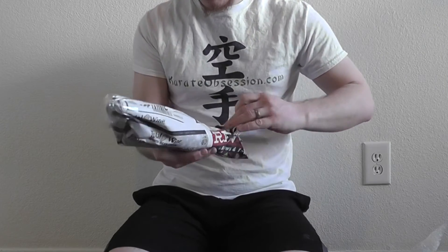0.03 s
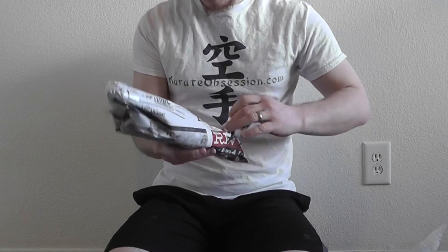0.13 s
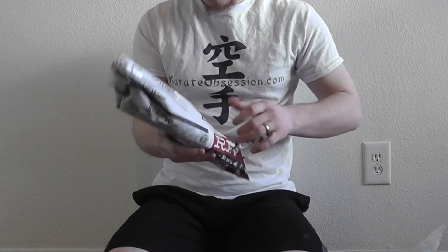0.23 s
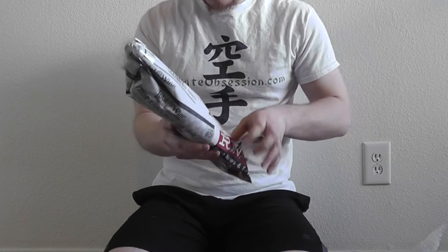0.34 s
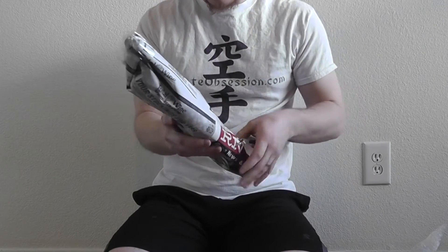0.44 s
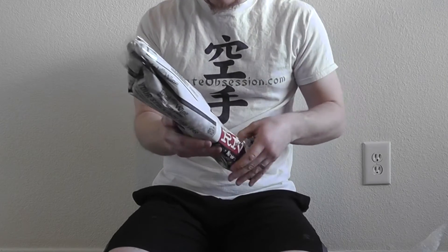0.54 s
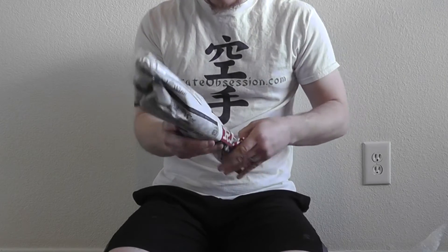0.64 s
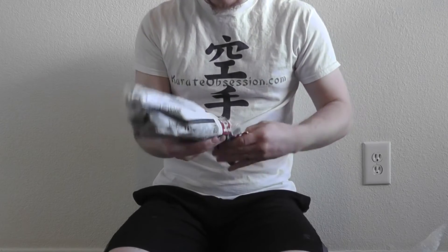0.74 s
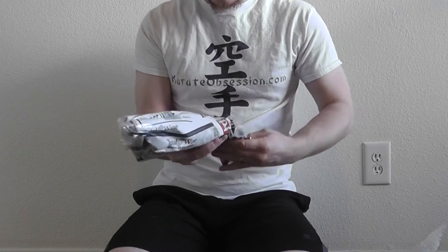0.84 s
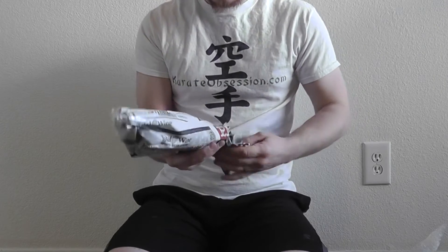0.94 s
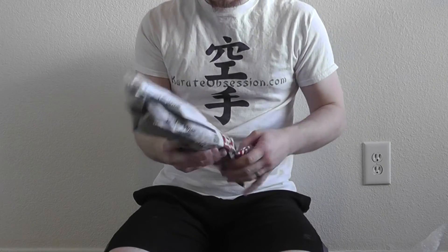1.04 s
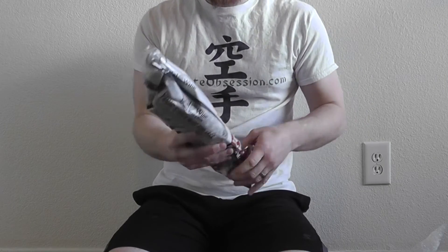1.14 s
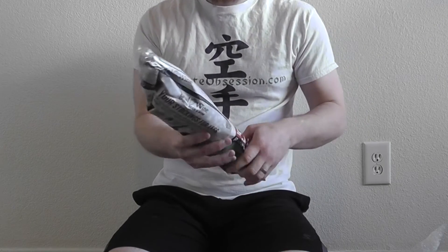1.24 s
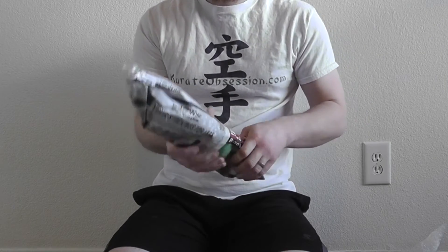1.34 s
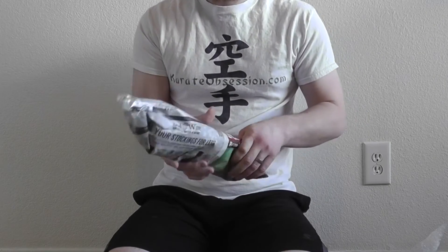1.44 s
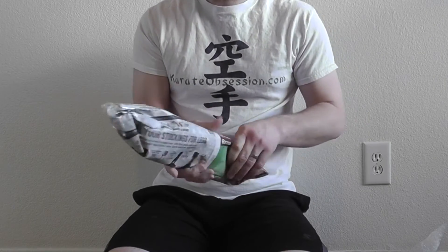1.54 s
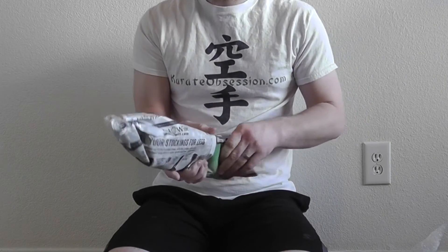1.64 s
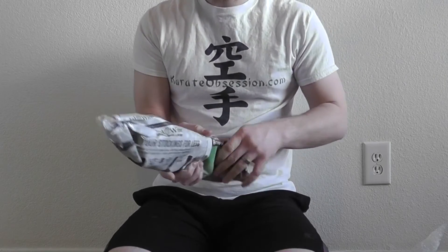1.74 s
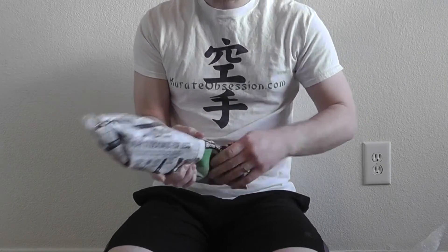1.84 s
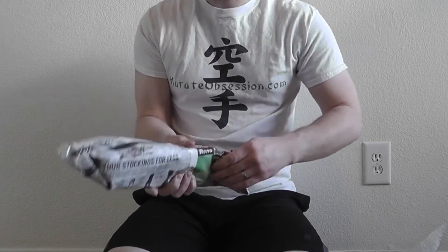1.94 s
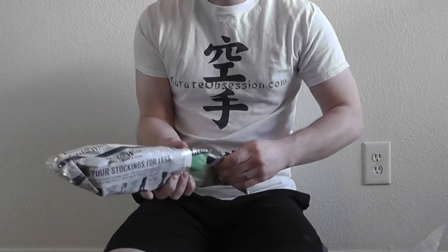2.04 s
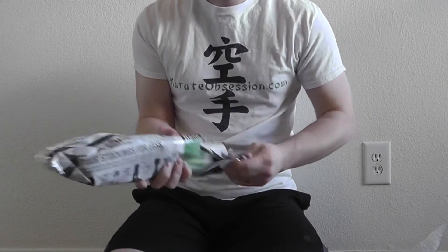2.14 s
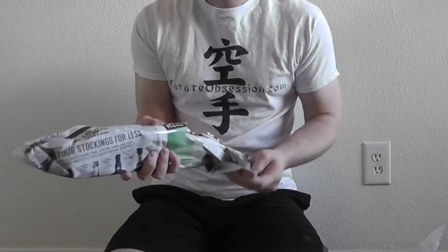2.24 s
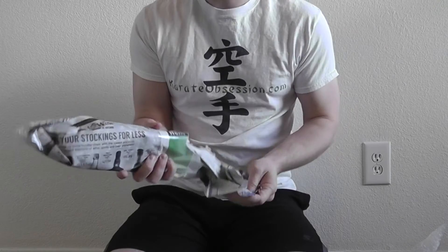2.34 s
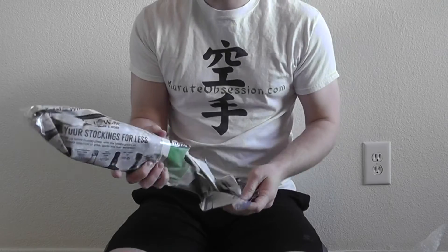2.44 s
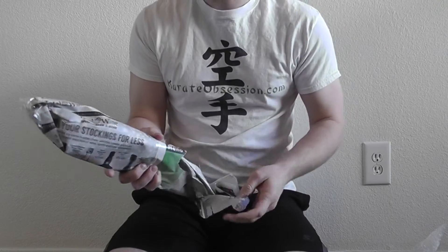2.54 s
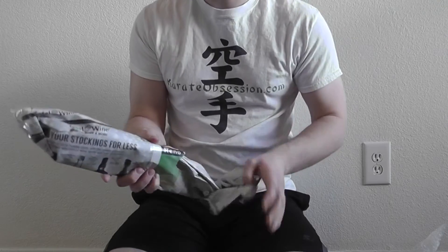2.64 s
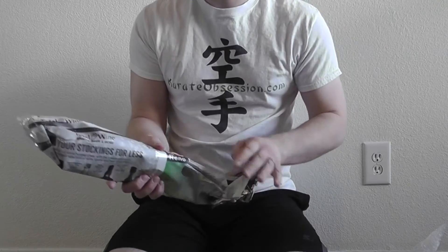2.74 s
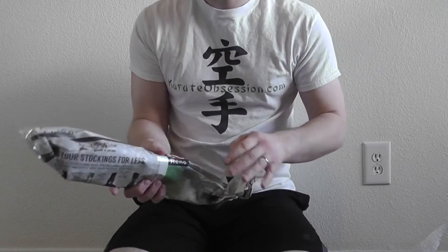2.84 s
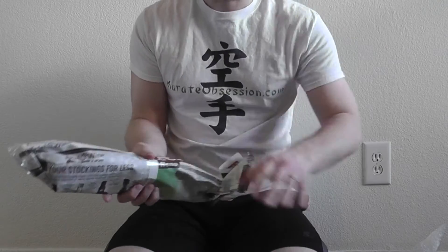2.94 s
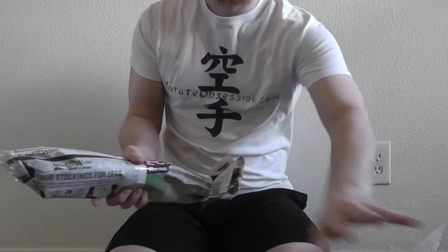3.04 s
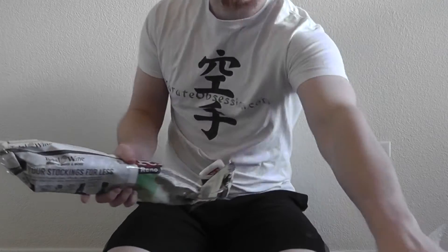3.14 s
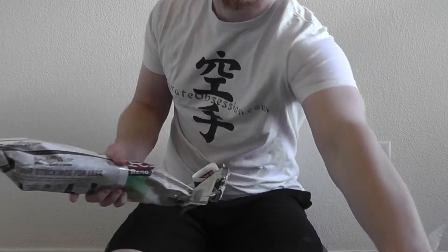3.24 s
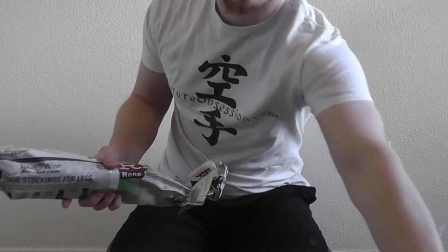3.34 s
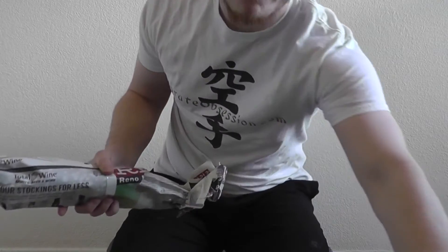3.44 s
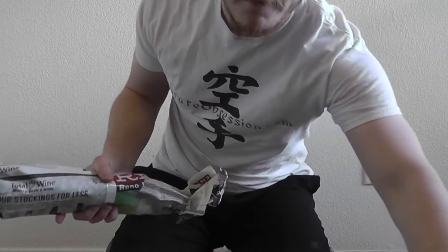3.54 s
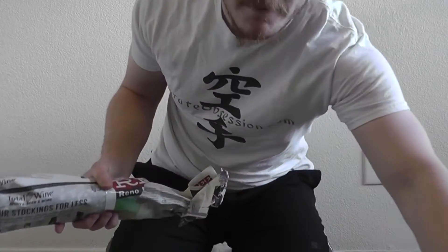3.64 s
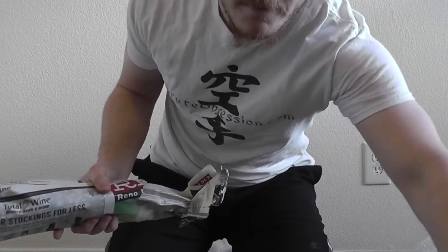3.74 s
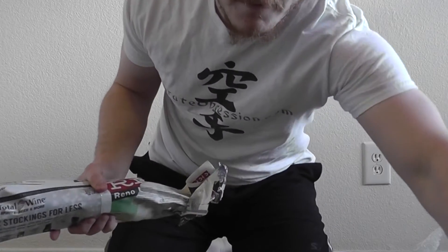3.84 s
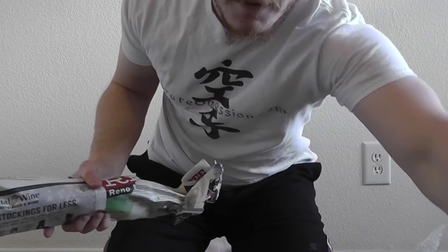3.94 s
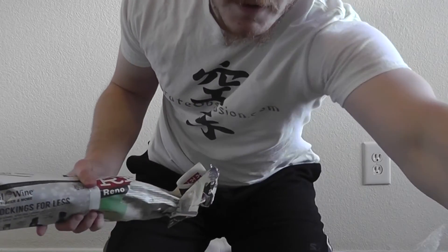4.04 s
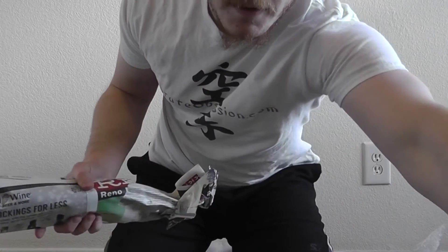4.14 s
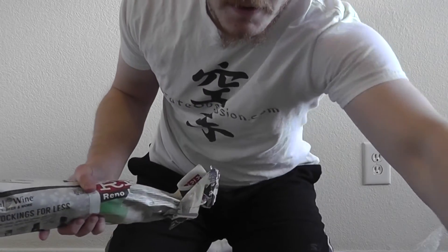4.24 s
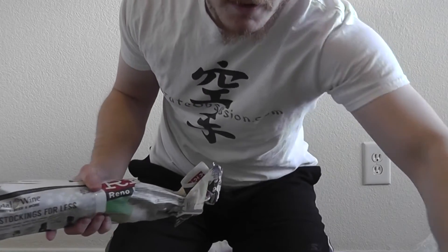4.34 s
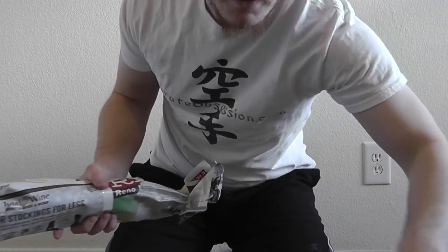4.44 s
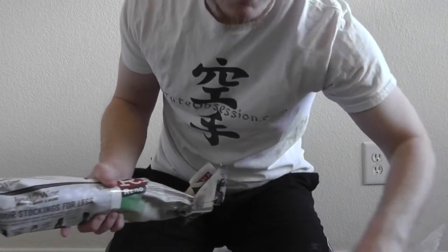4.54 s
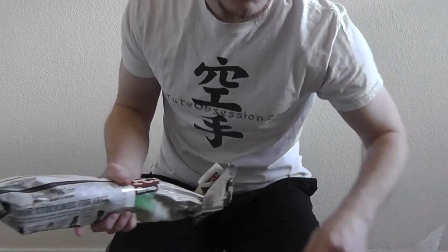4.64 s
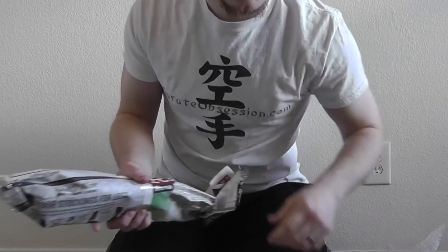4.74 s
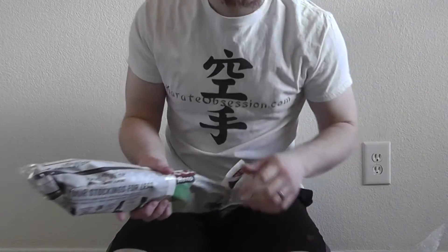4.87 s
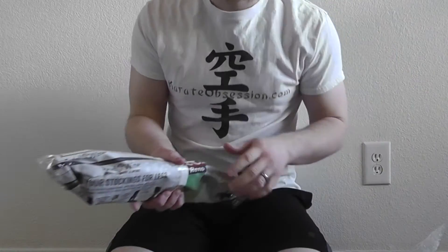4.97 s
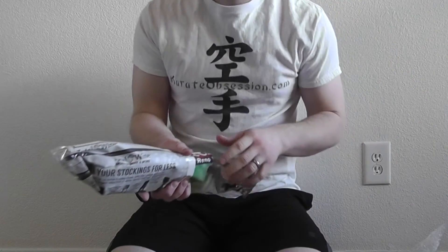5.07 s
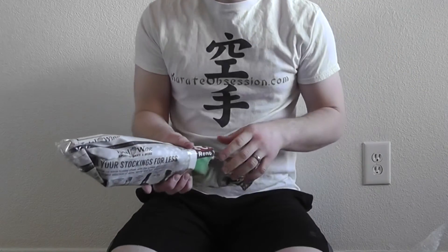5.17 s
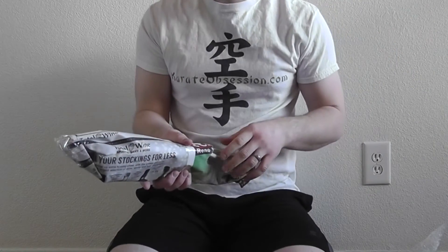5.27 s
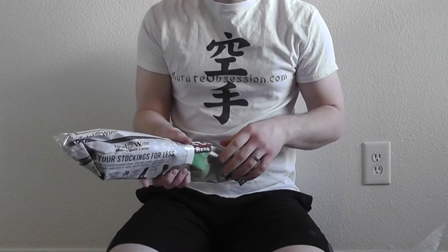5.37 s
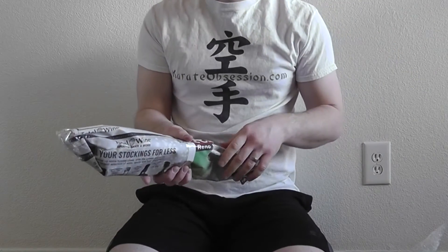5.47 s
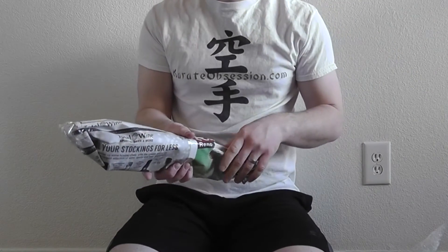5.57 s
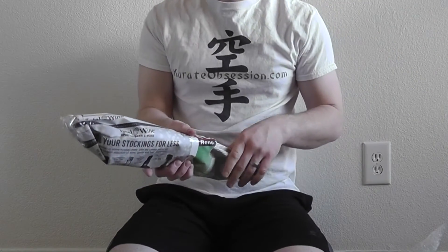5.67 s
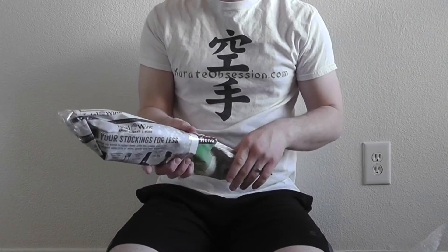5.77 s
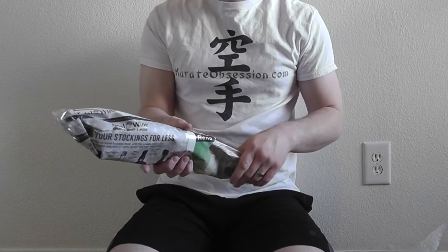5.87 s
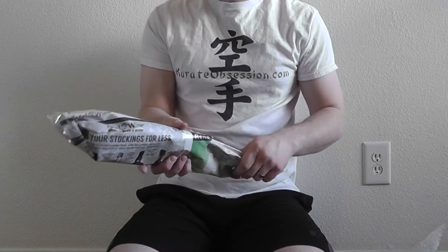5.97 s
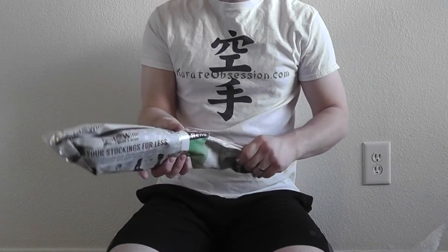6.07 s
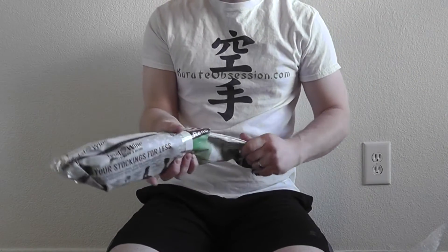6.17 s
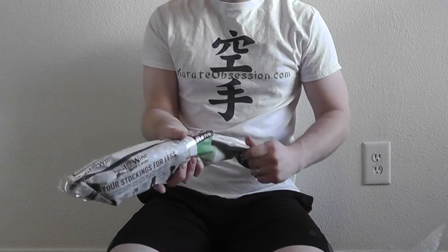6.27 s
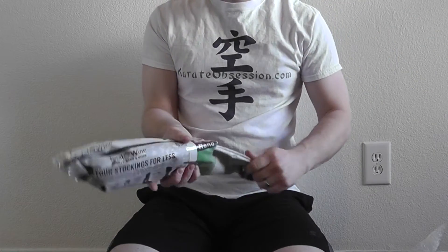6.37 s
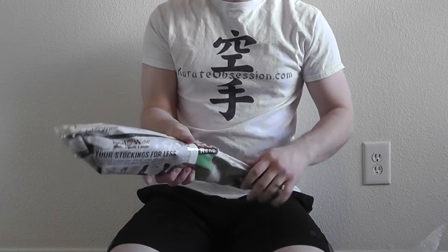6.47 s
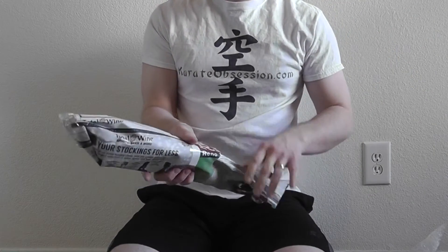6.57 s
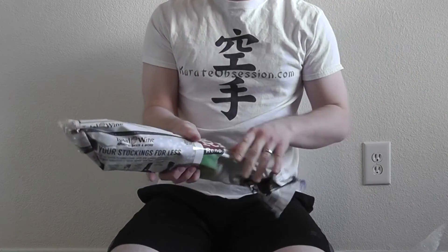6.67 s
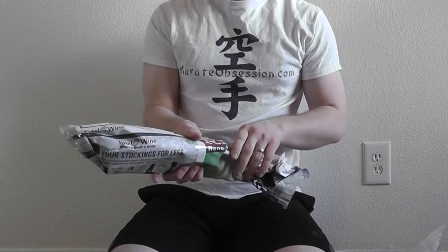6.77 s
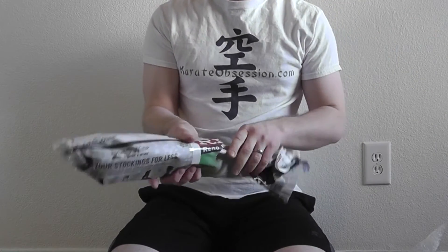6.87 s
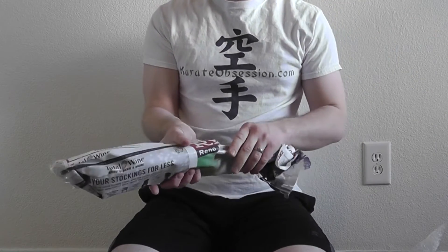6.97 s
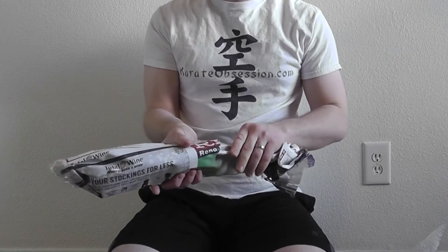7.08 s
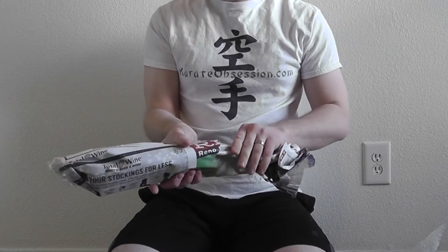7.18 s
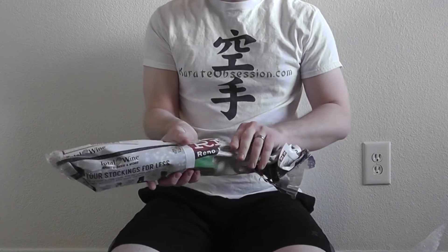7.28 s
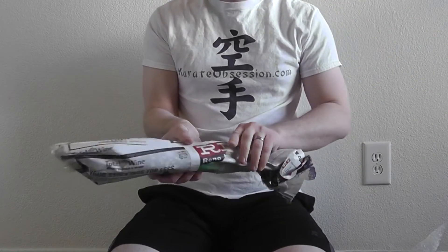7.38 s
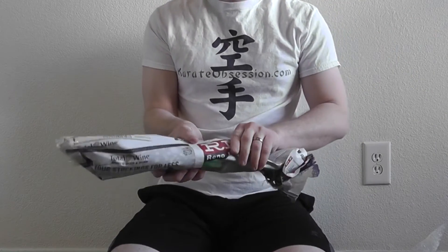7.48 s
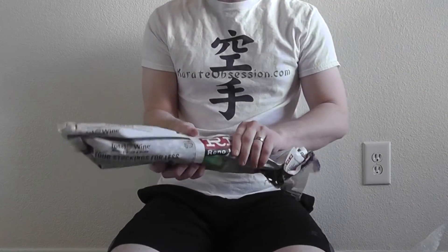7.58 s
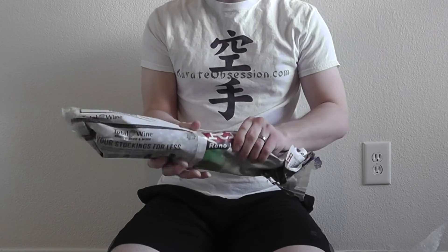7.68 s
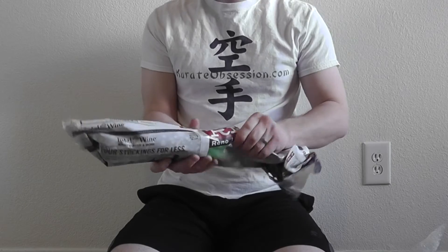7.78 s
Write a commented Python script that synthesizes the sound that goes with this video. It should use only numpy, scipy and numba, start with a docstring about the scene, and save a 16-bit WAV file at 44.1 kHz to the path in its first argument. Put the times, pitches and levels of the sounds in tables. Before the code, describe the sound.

Stiff newspaper wrapping crackles and snaps in irregular bursts, pauses with faint ticks and small metallic clinks, then crumples again in a small room.

```python
"""Newspaper crackles, snaps and crumples at once, as hands pull it open round a parcel in a small bare room.
Damped sines make its folds and snaps; shaped noise makes it rub. Beneath lie noise-built air and a house hum.
Jerks of the parcel puff low swings of air on the microphone ports. Later one hand reaches to a side table:
a small piece of steel clinks in fixed modes, and a low swing gives a soft thud.
The bass is widened by the puffs, three narrow bands are notched out and the loudest peaks are rounded."""
import sys
import numpy as np
from scipy import signal
from scipy.fft import rfft, irfft, next_fast_len
from scipy.io import wavfile
from scipy.ndimage import uniform_filter1d, map_coordinates
from numba import njit

SR = 44100
rng = np.random.default_rng(int(sys.argv[2]) if len(sys.argv) > 2 else 0)


def dump_mix(stems):
    """Bounce the given channels to the path in sys.argv[1] as a 16-bit WAV at rate SR."""
    frames = np.atleast_2d(stems).T  # one column per channel
    limited = np.clip(frames, -1, 1)  # hard clip at full scale
    pcm = np.round(limited * 32767).astype(np.int16)
    wavfile.write(sys.argv[1], SR, pcm)


N = 344421  # length in samples

# grips of the hands, each a burst of crumpling, before the sheet's colour:
# start_s, length_s, crease_level_db, big_folds_against_creases_db, fine_crackle_against_creases_db
HAND_GRIPS = [(0.0, 0.032, -46.5, 6, -12.5), (0.062, 0.024, -49, 10, 2.5), (0.118, 0.068, -53, 14, -4),
              (0.28, 0.027, -45.5, 4, 0.5), (0.456, 0.057, -48.5, 3.5, -0.5),
              (0.563, 0.053, -35.5, -4, -8.5), (0.65, 0.051, -38.5, 5, -2), (0.736, 0.11, -32, -2, -8),
              (1.021, 0.04, -38.5, -0.5, -5), (1.133, 0.036, -43.5, 2, -7.5), (1.195, 0.13, -47, 4.5, -4.5),
              (1.337, 0.11, -40, 4, -6.5), (1.511, 0.068, -44.5, 8.5, -1.5), (1.606, 0.089, -38.5, 1, -6.5),
              (1.703, 0.12, -45, -2, -7.5), (1.844, 0.059, -29.5, -4, -6.5), (1.972, 0.093, -32, -12, -3.5),
              (2.003, 0.036, -29, 2, -4.5), (2.072, 0.085, -28, -11, -3), (2.126, 0.033, -23.5, -10, 0),
              (2.193, 0.034, -37.5, 1, 1), (2.267, 0.16, -42, -6.5, -4), (2.447, 0.089, -41, 1.5, -5),
              (2.63, 0.12, -41, -0.5, -0.5), (2.747, 0.087, -48, 6, 0), (2.95, 0.28, -63.5, 0, -10),
              (3.85, 0.15, -67, 6, -6), (4.301, 0.028, -56, -3, 5), (4.933, 0.1, -53, 3.5, -3.5),
              (5.569, 0.2, -56.5, 1, -5), (5.756, 0.046, -41.5, -3.5, -8.5), (5.853, 0.14, -45, -10, -7.5),
              (5.932, 0.17, -36.5, -3, -5), (6.121, 0.18, -46, 3.5, -5), (6.343, 0.22, -47.5, -0.5, -3.5),
              (6.583, 0.059, -45.5, 0, -7), (6.639, 0.013, -43.5, -3, -7), (6.742, 0.017, -46, 9.5, -10),
              (6.877, 0.051, -47.5, 5, -5), (6.943, 0.079, -37.5, -6.5, -8.5),
              (7.158, 0.11, -58.5, 8.5, -6), (7.301, 0.2, -48.5, 6, -5), (7.415, 0.183, -42.5, -3.5, -7),
              (7.578, 0.044, -32.5, -1, -7.5), (7.659, 0.1, -38.5, 0.5, -5.5)]
GRIP_RISE_S, EASE_IN = 0.0052, 0.15  # shortest rise, and the share of a grip's length added to it
LET_GO_S, HELD_DB = 0.037, -81  # 1/e fall after a grip; floor of each fold size with the sheet held still
EFFORT_S = .06  # the hands' effort, not chance, sets the loudness over this span
# base pitch of the pocket that booms as the hands reshape it: time_s, pitch_hz
POCKET_PITCH = [(.8, 810), (1.03, 1230), (1.28, 584), (1.41, 1000), (1.6, 644), (2.0, 1090), (2.04, 790),
                (2.48, 734), (2.53, 1190), (2.69, 490), (2.75, 990), (2.8, 560), (2.9, 880), (5.7, 775),
                (6.1, 1184), (6.75, 840), (6.9, 1080), (7.17, 970), (7.2, 606), (7.42, 780), (7.63, 1060)]
# share of big folds that sound the pocket, relative spread of their pitch, 1/e life in cycles
POCKET_SHARE, POCKET_SPREAD, POCKET_CYCLES = .4, .12, 3.5
# single loud snaps of a fold, driving levels before the sheet's colour:
# start_s, level_db, centre_hz, hollow_knock_against_level_db
FOLD_SNAPS = [(0.023, -36, 1500, 12), (0.074, -20.5, 2240, -20), (0.1485, -28.5, 2100, 15.5),
              (0.3046, -17.5, 5900, -22), (0.464, -30, 8500, -15), (0.5694, -16.5, 3420, 3),
              (0.638, -15.5, 4280, -8), (0.6523, -2.5, 8100, -4), (0.699, -25, 7170, -20),
              (0.744, -22.5, 1950, 14.5), (0.7902, -11.5, 2570, -19), (0.828, -9.5, 2870, -16),
              (0.9947, -26, 7100, 3), (1.007, -20, 7600, -27), (1.0251, -23, 2320, 2.5),
              (1.0432, -22, 6100, -32), (1.2262, -23, 2590, -2), (1.278, -25.5, 6500, -2),
              (1.3515, -16, 2370, -1), (1.4104, -16.5, 2520, -4), (1.526, -20.5, 2260, 3),
              (1.6192, -16, 1960, 0), (1.647, -17.5, 6400, -27), (1.8436, -9, 3470, -4.5),
              (1.8745, -6, 7950, -14), (1.898, -11, 6040, -5.5), (1.9966, -9, 3200, -3),
              (2.1055, -11, 2200, -4), (2.1222, -9, 6660, -23), (2.131, -9, 8300, -24),
              (2.154, -18, 6530, -4), (2.1725, -8, 3020, -27), (2.1844, -5.5, 2880, -10.5),
              (2.4645, -16.5, 7500, -7), (2.473, -17.5, 1870, 0), (2.515, -22, 8000, -22),
              (2.66, -12.5, 6200, -28), (2.7324, -11.5, 3900, -38), (2.764, -17.5, 5000, -5),
              (2.813, -18, 2760, -19), (2.837, -24, 1800, 0), (2.8519, -17.5, 3300, -1.5),
              (3.1697, -39, 7530, -10), (3.1877, -30, 6300, -23), (3.3019, -36, 8500, -23),
              (3.4876, -39, 3000, -26), (3.698, -39, 3080, -32), (4.201, -34, 3800, -14),
              (4.3333, -29.5, 4400, -30), (5.02, -23.5, 6140, -24), (5.3258, -36.5, 8000, -11),
              (5.4764, -33, 2200, -19), (5.6823, -32.5, 1980, 0.5), (5.767, -21, 8000, -15),
              (5.943, -33, 1960, -46), (6.0535, -13.5, 2120, -58), (6.0713, -16, 2610, -14),
              (6.119, -14, 2520, -20), (6.1247, -12.5, 1880, -9), (6.248, -22, 6440, -24),
              (6.341, -26, 3750, -25), (6.402, -26, 6400, 5.5), (6.4165, -25, 1500, 0),
              (6.501, -20, 3470, -20), (6.6397, -20.5, 1900, -3), (6.8773, -21, 1880, -2),
              (7.1719, -14.5, 2920, 3), (7.193, -33, 1530, 18.5), (7.3441, -23, 3440, -28),
              (7.406, -11.5, 3840, -5.5), (7.4599, -18, 2680, -19), (7.4887, -21, 2620, -11),
              (7.605, -19, 4960, -29), (7.664, -12, 2130, -28), (7.7069, -12, 5100, -6),
              (7.733, -15, 3560, -20), (7.7475, -17.5, 2070, -16), (7.8035, -13.5, 3040, -1)]
SPRAY_S, KNOCK_CYCLES = .0005, 2.4  # time spread of a snap's rings; 1/e life of its knock
# colour of the paper sheet: frequency_hz, gain_db
SHEET_COLOUR = [(45, -30.5), (150, -6.5), (400, -5.5), (800, -3.5), (1500, -2.5), (3000, -2.5),
                (4800, -2.5), (7000, 5), (11000, 0.5), (16000, -3)]
# decay of the room: frequency_hz, t60_s
WALL_DECAY = [(150, 0.49), (600, 0.7), (2000, 0.61), (6000, 0.46), (14000, 0.053)]
# gain on the room's side signal: frequency_hz, side_gain_db
SIDE_WIDTH = [(60, -19), (240, -10), (480, -10), (950, -6.5), (1890, -5.5), (3770, -12.5), (7520, -11),
              (15000, 3)]
RUSTLE_WET_DB, SNAP_WET_DB, STEEL_WET_DB = -3.5, -5, -6  # mid room tail against direct sound
# spectral shape of the air common to both channels: frequency_hz, relative_level_db
AIR_MID_SHAPE = [(15, -60), (25, -45), (50, -25), (62, -7), (95, -11.5), (124, 2), (160, -6.5), (252, -8),
                 (651, -15), (1830, -19), (2750, -23.5), (4600, -28.5), (16500, -31.5)]
# spectral shape of the air that differs between channels: frequency_hz, relative_level_db
AIR_SIDE_SHAPE = [(15, -59), (25, -50), (252, -9.5), (483, -0.5), (1250, -11), (1830, -14), (2820, -22),
                  (5130, -51), (7710, -21), (14800, -23), (16500, -50)]
# house machinery resonances, before the mid and side trims: pitch_hz, width_hz, level_db
HOUSE_HUM = [(125.5, 5.2, -70.5), (251.9, 4.8, -67)]
# a low tone that comes and goes, level in the mid: start_s, length_s, level_db
LOW_DRONE = [(0.0, .9, -61), (1.25, .4, -64), (2.4, .72, -59), (3.93, .5, -57.5), (5.15, .38, -59),
             (6.65, .55, -64), (7.5, .3, -64)]
DRONE_HZ, DRONE_FADE_S = 155, 0.044
MOTOR_HZ, MOTOR_DB = 77.5, -63.5  # steady motor tone and its central level in the mid
# slow pushes of air on the ports, driving levels before a fixed lift: start_s, level_db, pitch_hz
AIR_PUFFS = [(.652, -57, 50), (2.183, -44, 110)]
# steel contacts, driving levels: start_s, level_db, modes_below_10_khz_trim_db
STEEL_CONTACTS = [(2.7785, -22.5, -10), (3.3358, -41.5, 2.5), (3.6632, -32, -6), (4.3125, -38.5, 1),
                  (4.3206, -24, -16), (4.3287, -32.5, -20), (4.3326, -25, -24), (5.22, -49, 10.5)]
# modes of the steel piece, before each contact's trim and scatter: pitch_hz, level_db, t60_s
STEEL_MODES = [(5430, -10, 0.027), (6850, -13.5, 0.07), (12030, -3, 0.027), (12360, -21, 0.23),
               (13390, -21, 0.036)]
TICK_DB, TICK_HZ, TICK_S = -18, 6000, .001  # each tick against its contact, centre pitch, 1/e life
# soft contact with the table, driving level before a fixed lift: start_s, level_db, pitch_hz
TABLE_THUDS = [(4.62, -47.5, 158)]
# balance of the channels: frequency_hz, left_against_right_db
STEREO_LEAN = [(60, -6.5), (180, -4.5), (550, -1), (1650, 1.5), (4970, 0.0), (15000, -0.5)]
# narrow dips: centre_hz, half_width_hz (where the dB depth is 1/e), gain_db
NARROW_NOTCHES = [(1789, 142, -7.5), (2355, 51, -13), (3063, 63, -9.5)]
CEILING, TOP_HZ = .55, 16000  # soft limit of amplitude; upper band edge


def amp(db):
    """Gain of a level in dB."""
    return 10 ** (np.asarray(db) / 20)


def unit(x):
    """x at rms 1."""
    return x / np.sqrt(np.mean(x ** 2) + 1e-20)


def along(points, hz):
    """Reads a curve of (Hz, value) points on a log frequency axis."""
    f, value = np.transpose(points)
    return np.interp(np.log(hz + 1), np.log(f + 1), value)


def wobble(rate):
    """A smooth random curve with rate knots a second."""
    knots = rng.standard_normal(int(N * rate / SR) + 4)
    return map_coordinates(knots, [np.arange(N) * rate / SR])


def filtered(x, response):
    """x shaped by a response of frequency."""
    m = next_fast_len(N + SR // 2)
    spectrum = rfft(x, m) * response(np.fft.rfftfreq(m, 1 / SR))
    return irfft(spectrum, m)[..., :N]


def shaped_noise(response):
    """Noise of rms 1 coloured by a response of frequency."""
    return unit(filtered(rng.standard_normal(N), response))


@njit
def add(out, rate, s, hz, gain, life):
    """Sums damped sines, each with start s, pitch, gain and 1/e life in seconds."""
    for i in range(len(s)):
        first = int(s[i] * rate) + 1
        pole = 2j * np.pi * hz[i] - 1 / life[i]
        now = gain[i] * np.exp(pole * (first / rate - s[i]))
        step = np.exp(pole / rate)
        for n in range(first, min(first + int(6 * life[i] * rate), len(out))):
            out[n] += now.imag
            now *= step


def grains(s, hz, gain, life):
    """A track of damped sines from arrays that broadcast together."""
    out = np.zeros(N)
    settings = np.broadcast_arrays(s, hz, gain, life)
    add(out, float(SR), *[np.ravel(a).astype(float) for a in settings])
    return out


def bursts(start, length, rise_s, fall_s):
    """One power envelope per row: rises from its start, holds to the end of its length, then falls."""
    t = np.arange(0, N, 32) / SR - start[:, None]
    rise = np.clip(t / rise_s, 0, 1)
    return rise * np.exp(-2 * np.maximum(t - length[:, None], 0) / fall_s)


def level(shape, db, floor_db):
    """Gain per sample of bursts that add in power over a floor."""
    gain = np.sqrt(amp(db) ** 2 @ shape + amp(floor_db) ** 2)
    return np.interp(np.arange(N), np.arange(0, N, 32), gain)


def pocket(s, hz, life, chance):
    """The hollow of the paper makes some big folds ring longer, near its own pitch."""
    spread = 1 + POCKET_SPREAD * np.cos(2 * np.pi * chance / POCKET_SHARE)
    near = np.interp(s, *np.transpose(POCKET_PITCH)) * spread
    inside = chance < POCKET_SHARE
    return np.where(inside, near, hz), np.where(inside, POCKET_CYCLES / near, life)


def rustle():
    """Each small buckling of the sheet sounds in folds of three sizes; a few bucklings are much bigger."""
    start, length, crease_db, fold_db, fine_db = np.transpose(HAND_GRIPS)
    shape = bursts(start, length, GRIP_RISE_S + EASE_IN * length[:, None], LET_GO_S)
    draw = rng.random((9000, 2))
    s = draw[:, :1] * N / SR
    moment = (s * SR).astype(int)
    clumps = wobble(55)[moment]
    strength = np.minimum(-np.log(draw[:, 1:]), 2.6)
    # low_hz, high_hz, life_cycles, scatter_db, clumping_db, rubbing_share, level_db
    sizes = [(299.0, 1490, 0.7, 2.75, 2.2, 0.46, crease_db + fold_db),
             (1420, 4600, 1.45, 5.9, 2.47, 0.56, crease_db),
             (4930, 18500, 2.2, 7.5, 3.5, 0.4, crease_db + fine_db)]
    out = np.zeros(N)
    for low_hz, high_hz, cycles, scatter_db, clump_db, rubbing, level_db in sizes:
        own = rng.random((len(s), 2, 4))
        drift = .15 * wobble(14)[moment]  # the colour wanders within the range
        place = np.clip(own[..., 0] ** np.exp(4 * drift), 0, 1)
        hz = low_hz * (high_hz / low_hz) ** place
        life = cycles / hz
        if low_hz < min(pitch for _, pitch in POCKET_PITCH):  # only the big folds
            hz, life = pocket(s, hz, life, own[..., 3])
        size = amp(scatter_db * strength + clump_db * clumps) * np.cos(2 * np.pi * own[..., 1])
        pops = grains(s + 0.00152 * own[..., 2], hz, size / np.sqrt(life), life)
        power = abs(uniform_filter1d(pops ** 2, round(EFFORT_S * SR)))
        pops = unit(pops / np.sqrt(power + 1e-12))  # evens out chance loudness

        def rub_band(f):
            return 1 / np.sqrt((f + 1) * (1 + (low_hz / (f + 1)) ** 6) * (1 + (f / high_hz) ** 6))

        rub = shaped_noise(rub_band)
        out += level(shape, level_db, HELD_DB) * unit(pops + rubbing * rub)
    return out


def snaps():
    """A fold gives way: a spray of short rings about its centre, then a hollow knock near the pocket pitch."""
    s, db, centre_hz, knock_db = np.transpose(FOLD_SNAPS)[..., None]
    spray = rng.standard_normal((len(s), 40, 3))
    body = rng.standard_normal((len(s), 4, 3))
    hz = np.clip(centre_hz * np.exp(0.4 * spray[..., 0]), 500, SR / 2.5)
    crack_s = s + SPRAY_S * (2 + np.clip(spray[..., 1], -2, 4))
    crack = grains(crack_s, hz, amp(db - 12.0) * np.sign(spray[..., 2]), 1.36 / hz)
    hz = np.interp(s, *np.transpose(POCKET_PITCH)) * np.exp(0.19 * body[..., 0])
    knock_s = s + 2 * SPRAY_S + 0.001507 * abs(body[..., 1])
    knock_gain = amp(db + knock_db - 11) * np.sign(body[..., 2])
    return crack + grains(knock_s, hz, knock_gain, KNOCK_CYCLES / hz)


def room(x, wet_db):
    """Mid and side: the wall behind answers first, then a noise tail that changes as the hands move."""
    hop, out = SR // 3, np.zeros((2, N + 2 * SR))
    padded = np.pad(x, (hop, 2 * hop))
    fade = signal.windows.hann(2 * hop, sym=False)
    for start in range(0, N + hop, hop):
        hz, t, z = signal.stft(rng.standard_normal((2, SR // 2)), SR, nperseg=256)
        decay = amp(-60 * t / along(WALL_DECAY, hz)[:, None])
        tail = signal.istft(z * decay, SR, nperseg=256)[1]
        tail = np.pad(tail, ((0, 0), (round(.0028 * SR), 0)))
        tail = tail / np.linalg.norm(tail[0]) * amp([[wet_db], [0]])
        tail[0, 0] = 1  # direct sound
        tail[0, round(.003 * SR)] += .4  # wall behind
        tail[1, :24] = 0.18 * rng.standard_normal(24)  # wide source: direct sound differs between ports
        piece = signal.fftconvolve((padded[start:start + 2 * hop] * fade)[None], tail, axes=1)
        out[:, start:start + piece.shape[1]] += piece
    mid, side = out[:, hop:hop + N]
    return np.array([mid, filtered(side, lambda f: amp(along(SIDE_WIDTH, f)))])


def narrow(hz, width_hz):
    """Noise of rms 1 in one resonance, width taken at half amplitude."""
    return shaped_noise(lambda f: 1 / (1 + ((f - hz) / width_hz * 2) ** 2))


def tone(hz):
    """A sine of rms 1 whose phase drifts a little."""
    return np.sqrt(2) * np.sin(2 * np.pi * hz * np.arange(N) / SR + .4 * wobble(5))


def room_tone():
    """Mid and side: steady air as shaped noise, machinery as resonant noise and drifting sines."""
    air_mid = amp(-56.0) * shaped_noise(lambda f: amp(along(AIR_MID_SHAPE, f)))
    air_side = amp(-63.0) * shaped_noise(lambda f: amp(along(AIR_SIDE_SHAPE, f)))
    air = np.array([air_mid, air_side])
    hum = np.array([sum(amp(db) * narrow(hz, width_hz) for hz, width_hz, db in HOUSE_HUM) for _ in air])
    start, length, db = np.transpose(LOW_DRONE)
    drone_gain = level(bursts(start, length, DRONE_FADE_S, DRONE_FADE_S), db, -72)
    drone = drone_gain * tone(DRONE_HZ)
    motor = amp(MOTOR_DB + 0.64 * wobble(3.0)) * tone(MOTOR_HZ)
    return air + hum * amp([[-1.5], [4.5]]) + (drone + motor) * np.array([[1], [.8]])


def pushes(table, cycles):
    """Single low swings: sines damped within a cycle or two, lifted 12 dB."""
    s, db, hz = np.transpose(table)
    return grains(s, hz, amp(db + 12.0), cycles / hz)


def air_puffs():
    """Jerks of the parcel push air on the ports: heavily damped low swings."""
    return pushes(AIR_PUFFS, 0.45)


def steel():
    """Every contact rings the same modes plus a dry tick; the modes below 10 kHz follow the kind of blow."""
    s, db, low_db = np.transpose(STEEL_CONTACTS)[..., None]
    hz, mode_db, t60 = np.transpose(STEEL_MODES)
    scatter_db = rng.normal(0, 2.5, (len(s), len(hz)))
    ring_db = db + mode_db + np.where(hz < 10000, low_db, 0) + scatter_db
    ring = grains(s, hz, amp(ring_db), t60 / np.log(1000))
    tick_hz = np.clip(TICK_HZ * np.exp(0.29 * rng.standard_normal((len(s), 8))), 500, SR / 2.5)
    tick_gain = amp(db + TICK_DB) * rng.choice([-1, 1], tick_hz.shape)
    return ring + grains(s, tick_hz, tick_gain, TICK_S)


def table_thud():
    """A soft contact with the table: one damped low swing."""
    return pushes(TABLE_THUDS, 1.5)


def scene():
    """Paper, steel and table in the room; air puffs reach the two ports in opposite sense."""
    def sheet(f):
        return amp(along(SHEET_COLOUR, f))

    paper = room(filtered(rustle() + table_thud(), sheet), RUSTLE_WET_DB)
    paper = paper + room(filtered(snaps(), sheet), SNAP_WET_DB)
    clinks = room(filtered(steel(), lambda f: f > 300), STEEL_WET_DB) * amp([[-1], [3]])
    mid, side = paper + room_tone() + clinks
    puffs = air_puffs()
    mid, side = mid + puffs, side - 4.8 * puffs
    left_right = np.array([mid + side, mid - side])
    return filtered(left_right, lambda f: amp(along(STEREO_LEAN, f) * np.array([[.5], [-.5]])))


def record(dry):
    """Three narrow notches, a soft ceiling on the peaks, then the band limit."""
    def notch_gain(f):
        return amp(sum(db * np.exp(-((f - hz) / width_hz) ** 2) for hz, width_hz, db in NARROW_NOTCHES))

    x = filtered(dry, notch_gain)
    x = x / (1 + abs(x / CEILING) ** 4) ** (1 / 4)
    return filtered(x, lambda f: f < TOP_HZ)


dry = scene()
out = record(dry)
dump_mix(out)
```